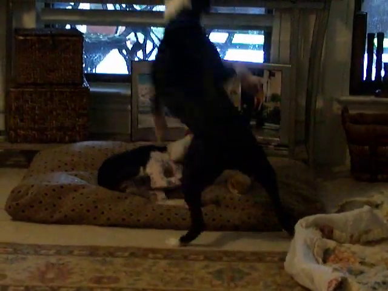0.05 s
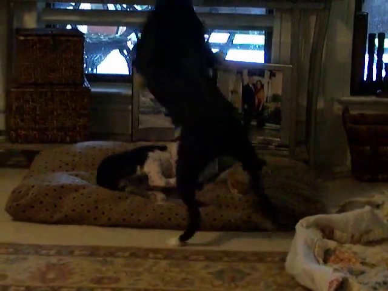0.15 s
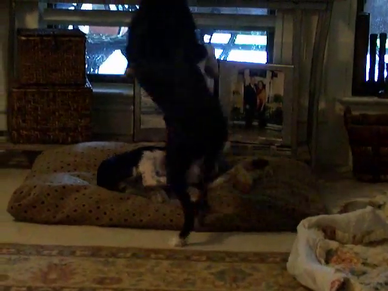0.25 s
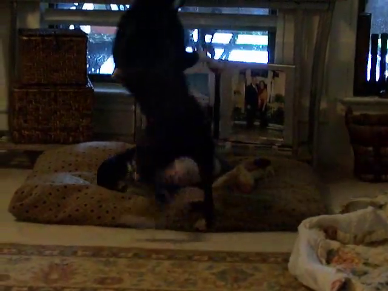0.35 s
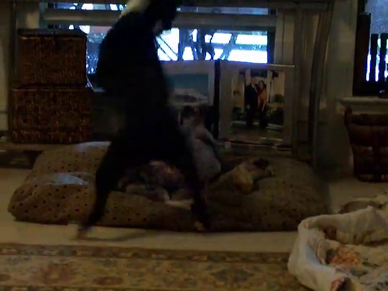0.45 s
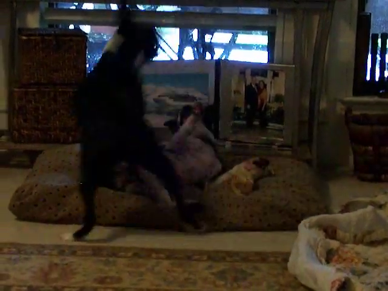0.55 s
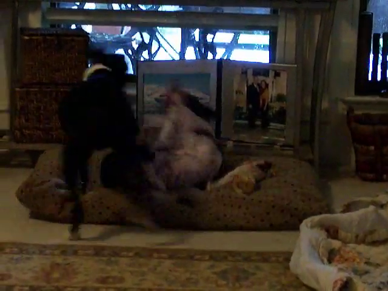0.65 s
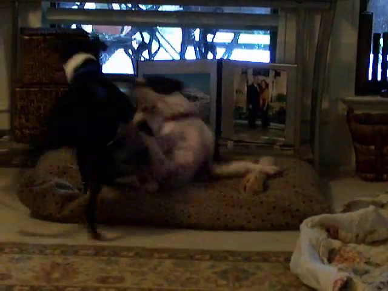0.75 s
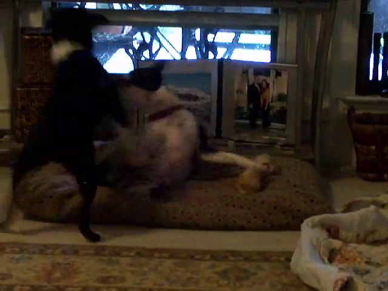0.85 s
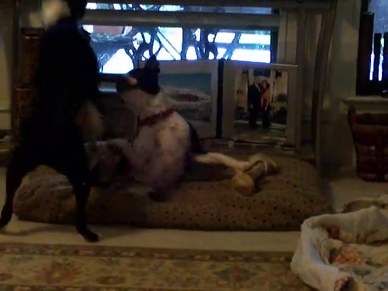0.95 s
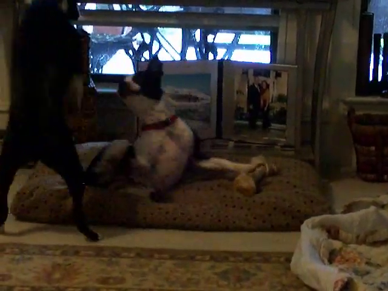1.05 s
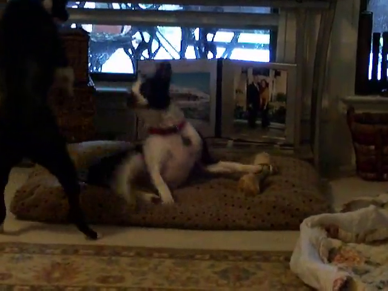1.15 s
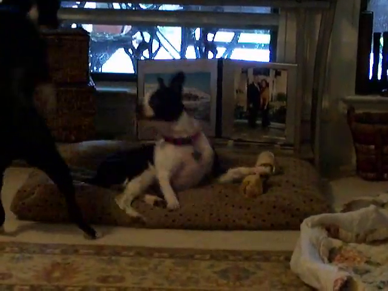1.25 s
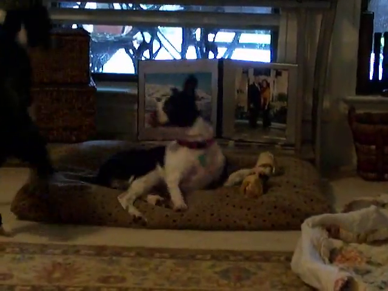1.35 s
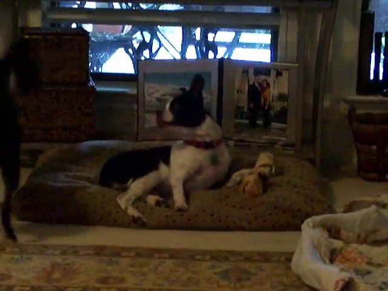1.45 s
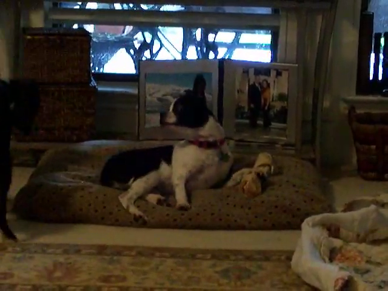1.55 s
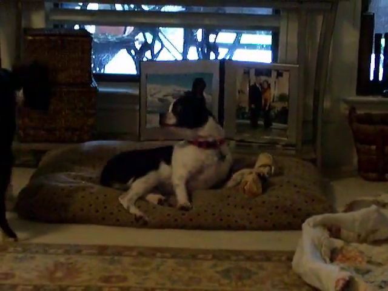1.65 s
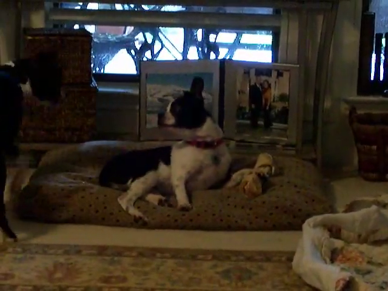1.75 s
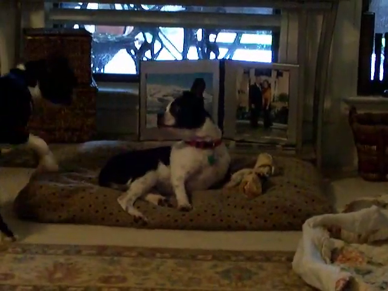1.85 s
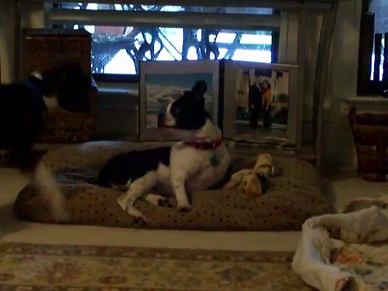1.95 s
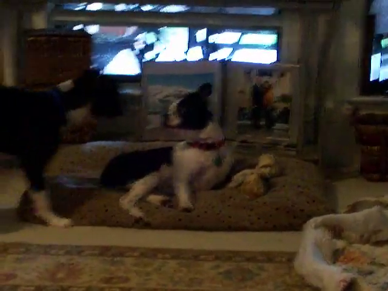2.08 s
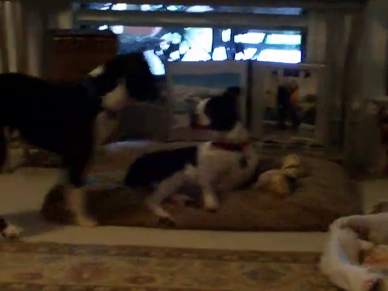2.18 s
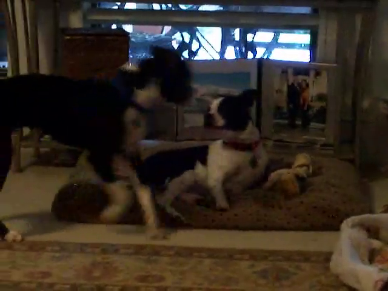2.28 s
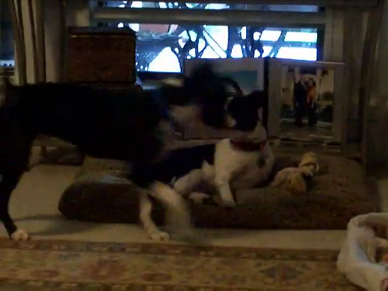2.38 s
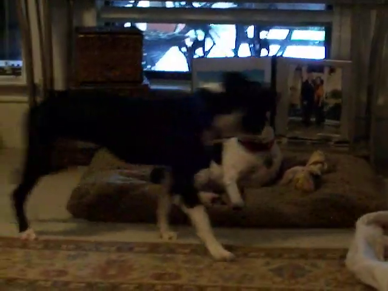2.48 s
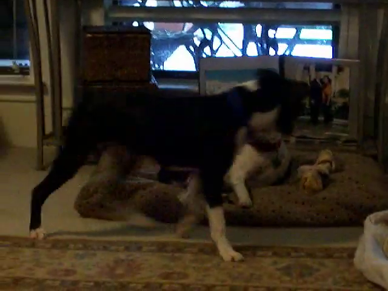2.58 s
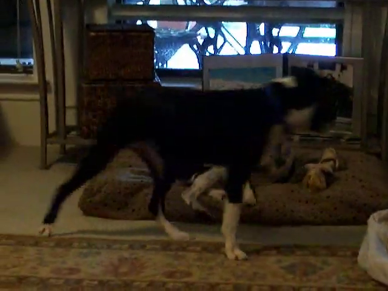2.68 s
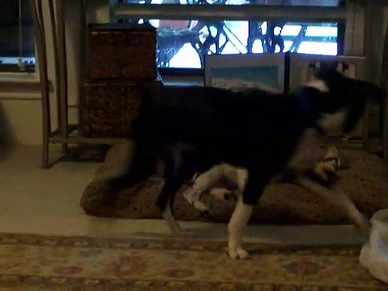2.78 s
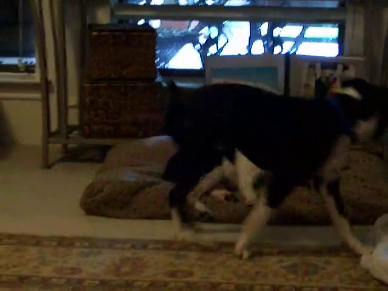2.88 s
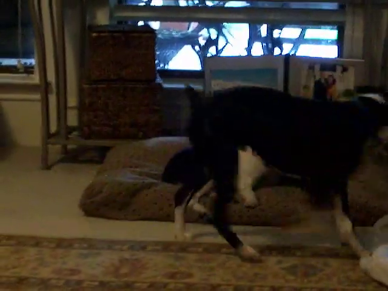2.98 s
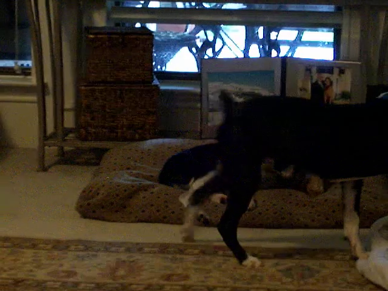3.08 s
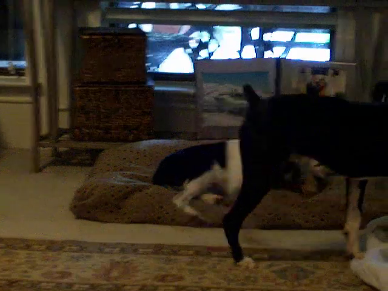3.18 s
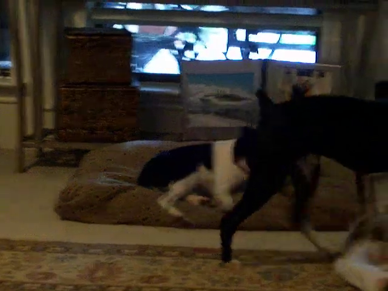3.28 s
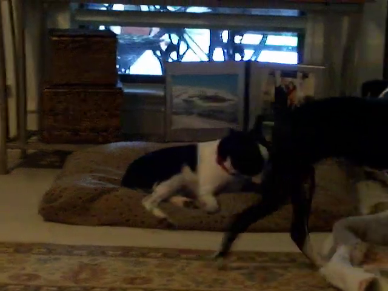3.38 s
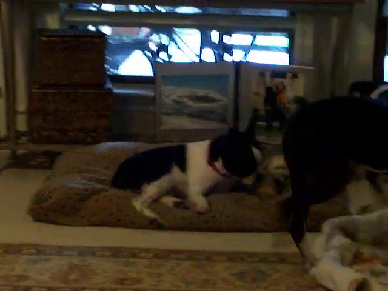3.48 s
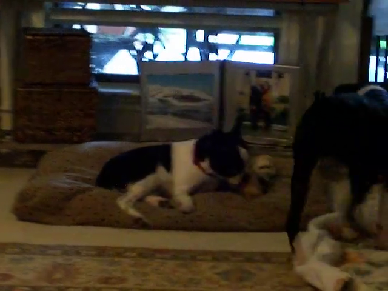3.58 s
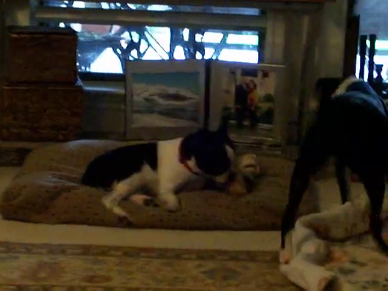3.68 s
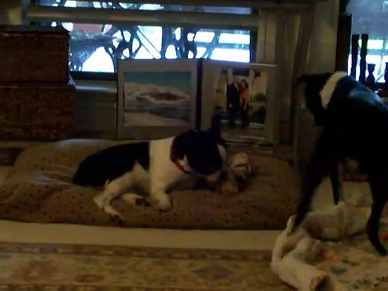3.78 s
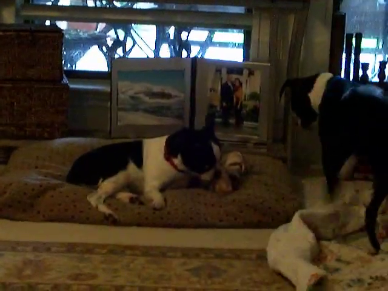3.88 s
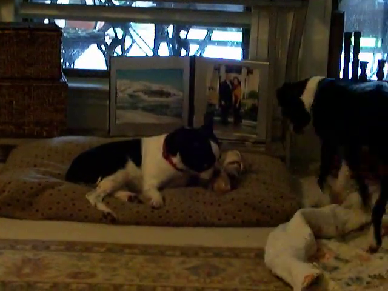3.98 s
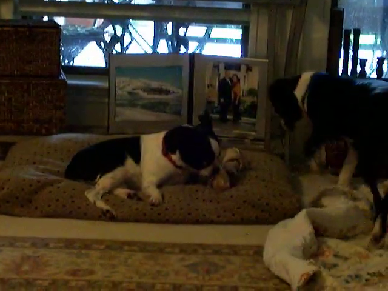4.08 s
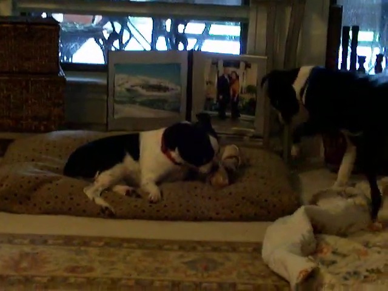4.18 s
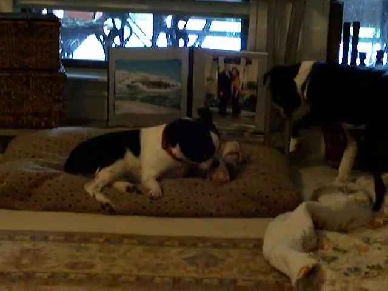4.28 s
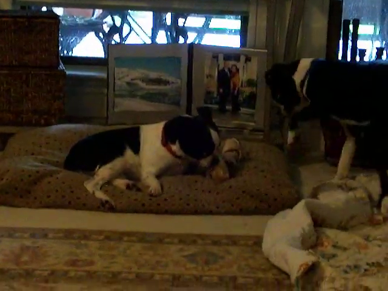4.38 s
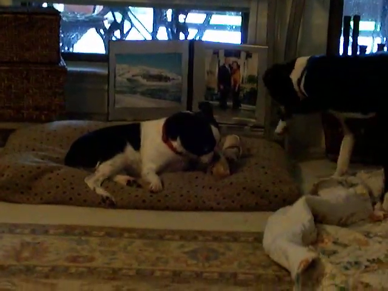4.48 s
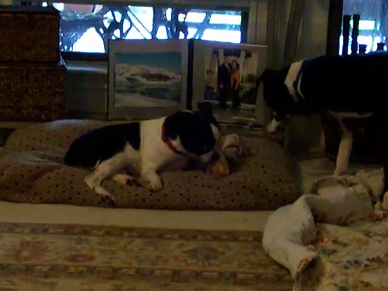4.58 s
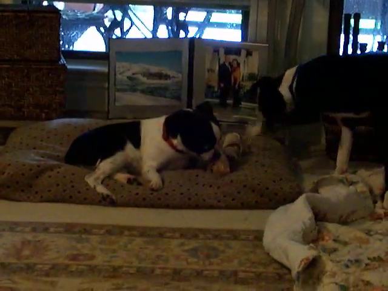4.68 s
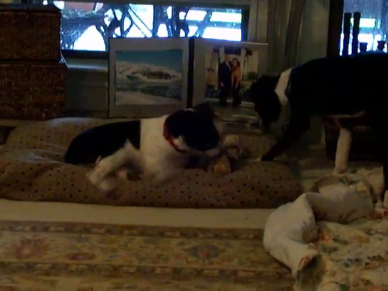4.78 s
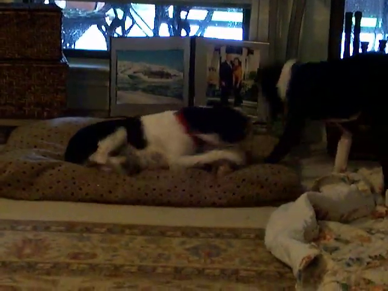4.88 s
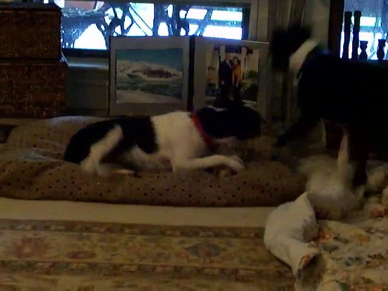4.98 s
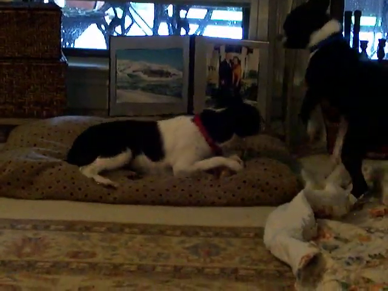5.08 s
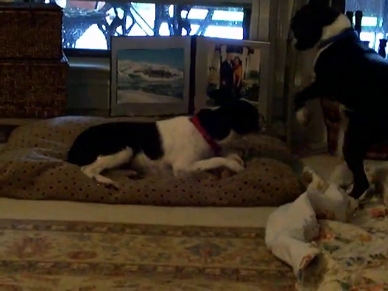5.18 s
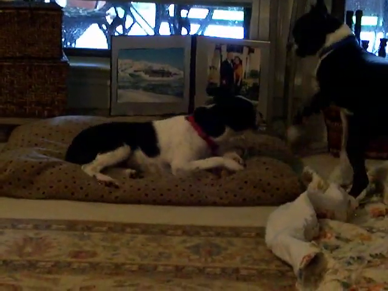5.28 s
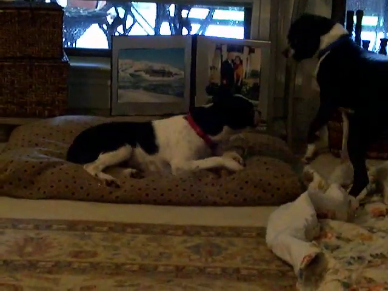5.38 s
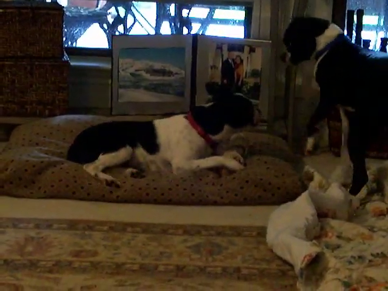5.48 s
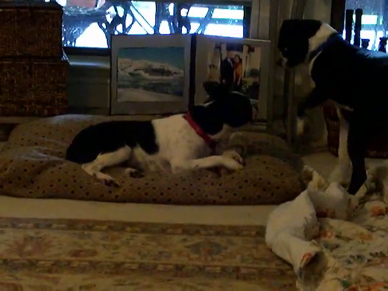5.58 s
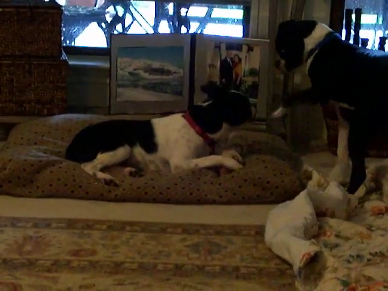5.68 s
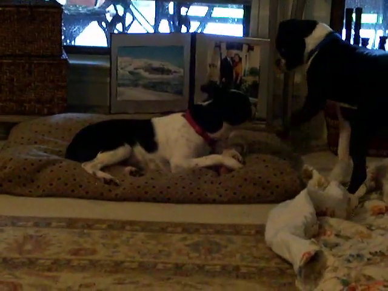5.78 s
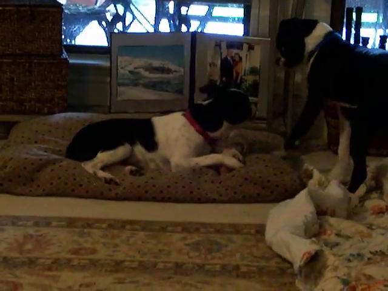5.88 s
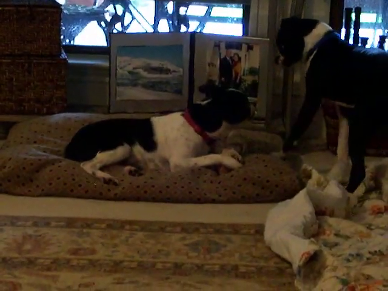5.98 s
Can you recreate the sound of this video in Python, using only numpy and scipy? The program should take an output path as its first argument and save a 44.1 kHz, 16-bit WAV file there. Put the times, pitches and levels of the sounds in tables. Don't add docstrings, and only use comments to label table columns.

```python
import sys
import numpy as np
from scipy import signal
from scipy.fft import rfft, irfft, next_fast_len
from scipy.io import wavfile
from scipy.ndimage import map_coordinates

SR = 44100
rng = np.random.default_rng(int(sys.argv[2]) if len(sys.argv) > 2 else 0)


def elevation(decibels):
    levels = np.asarray(decibels, float)
    return 10 ** (levels / 20)


def transcribe(signal):
    frames = np.atleast_2d(signal).T
    limited = np.clip(frames, -1, 1)
    pcm = np.round(limited * 32767).astype(np.int16)
    wavfile.write(sys.argv[1], SR, pcm)


N = 266584
T = np.arange(N) / SR


def unit(x):
    return x / np.sqrt(np.mean(x ** 2) + 1e-20)


def along(points, hz):
    f, v = np.transpose(points)
    return np.interp(np.log(hz + 1), np.log(f + 1), v)


def curves(rows):
    s, *columns = np.transpose(rows)
    opens_at_once = (s[0] == 0) * (T < .01)
    gate = np.clip(np.minimum(T - s[0], s[-1] - T) * 500 + opens_at_once, 0, 1)
    return [np.interp(T, s, column) for column in columns] + [gate]


def wobble(rate):
    knots = rng.standard_normal(int(N * rate / SR) + 4)
    return map_coordinates(knots, [T * rate])


def swell(s, db, rise, held, fall):
    before = np.maximum(s - T, 0)
    after = np.maximum(T - s - held, 0)
    return elevation(db - 20 * before / abs(rise) - 20 * after / abs(fall))


def filtered(x, response):
    m = next_fast_len(N + 8192)
    return irfft(rfft(x, m) * response(np.fft.rfftfreq(m, 1 / SR)), m)[:N]


def cavity(modes):
    def response(f):
        total = 0
        for k, (centre, width, db) in enumerate(modes):
            resonance = 1j * f * width / (centre * centre - f * f + 1j * f * width)
            total = total + (-1) ** k * elevation(db) * resonance
        return total
    return response


def steep(hz):
    return lambda f: (1j * f / (hz + 1j * f)) ** 4


def noise(modes):
    return unit(filtered(rng.standard_normal(N), cavity(modes)))


# start_s, depth_db, held_s
DUCKS = [
    (.675, 15.5, 1.0),
    (1.5, 4, .3),
    (4.83, 9.5, 1.3),
]


def gain_control(dip):
    duck_s, recover_s, dip_s = 0.066, 1.97, .15
    gain_db = np.zeros(N)
    for s, depth_db, held in DUCKS:
        t = np.maximum(T - s, 0)
        back = np.exp(-np.maximum(t - held, 0) / recover_s) + dip * np.exp(-t / dip_s)
        gain_db -= depth_db * (1 - np.exp(-t / duck_s)) * back
    return gain_db


# freq_hz, density_db
HISS = [(150, -33), (300, -1), (500, -3), (800, -8), (1300, -13), (3000, -17.5), (5000, -19.5),
        (6500, -19.5), (7500, -14.5), (8500, -24.5), (9200, -33)]
# freq_hz, density_db
RUMBLE = [(40, -19), (60, 4), (120, -1.5), (170, -2), (260, -7), (400, -18.5), (600, -37.5)]
# freq_hz, density_db
HANDLING = [(8, -18), (18, 12), (40, 1.5), (60, -1), (100, -43)]
# peak_s (full level reached), level_db, held_s
SHIFTS = [(0, -44.5, 0.074), (.68, -43.5, 0.013), (1.48, -49, .25), (2.12, -52, .03), (2.71, -45.5, .01),
          (3.18, -45.5, .44), (3.87, -49, .1), (4.46, -48.5, 0.0094), (4.73, -45, .01),
          (5.21, -44.5, 0.0077), (6.03, -48, .01)]


def background():
    hiss_db, rumble_db, whine_db, hand_db = -55, -46, -62.5, -48.5
    whine_hz, shift_rise_s, shift_fall_s = 6903.3, .15, 0.09
    gain_db = gain_control(-0.19)
    hiss, rumble, hand = [unit(filtered(rng.standard_normal(N), lambda f: elevation(along(colour, f))))
                          for colour in (HISS, RUMBLE, HANDLING)]
    whine = np.sqrt(2) * np.sin(2 * np.pi * whine_hz * T + .3 * wobble(20))
    whine = elevation(whine_db + gain_control(1.1)) * whine
    shifts = [swell(s, db, shift_rise_s, held, shift_fall_s) for s, db, held in SHIFTS]
    resting = elevation(hand_db + 0.3 * gain_db + 1.7 * wobble(3.7))
    grip = np.max(shifts + [resting], axis=0)
    hand = grip * elevation(1.6 * wobble(30)) * hand
    rumble = elevation(rumble_db + gain_db + 0.62 * wobble(8.0)) * rumble
    hiss = elevation(hiss_db + gain_db + 0.38 * wobble(8.1)) * hiss
    return hiss + whine + rumble + hand


# peak_s (full level reached), level_db, rise_s, held_s, fall_s
AIR = [(0, -35, .01, 0.0047, 0.078), (.5, -44, .03, 0.1, 0.011), (.6, -45.5, 0.11, 0.063, 0.004),
       (.79, -49.5, .06, .005, 0.08), (1.512, -49, 0.014, 0.027, 0.083), (2.055, -64.5, .045, .055, 0.049),
       (3.262, -58, .04, 0.032, .07), (3.319, -55, 0.053, 0.044, .09), (4.75, -46, .002, .05, 0.0036),
       (5.748, -61.5, .1, 0.065, 0.11), (.527, -56, .03, .035, .06), (5.0, -54.5, .1, 0.071, 0.16)]
# freq_hz, width_hz, level_db
AIRWAYS = [
    [(1610, 260, 0), (2170, 420, -1.5), (3896, 1800, -11), (8200, 3200, -20.5)],
    [(181, 41, -0.5), (407, 76, -2.5), (907.5, 250, -13.5)],
    [(1220, 3700, -2.5), (2780, 180, 5.5), (3660, 1100, -9.5), (6600, 900, -19.5)],
    [(450, 120, -3.5), (620, 150, -3.5)],
    [(701, 160, -2.5), (1035, 78, 7.5), (2090, 1250, -5), (3970, 300, -1.5), (5480, 3000, -10)],
    [(630, 85, 1.5), (1470, 160, 2), (2320, 230, -4), (3100, 800, -13)],
    [(1004, 490, -8), (1654, 180, 3), (1910, 340, -0.5)],
    [(620, 230, -2.5), (1510, 68, 4.5), (2120, 350, -2.5), (2450, 100, -4)],
    [(1730, 750, -7), (2704, 740, -2), (3880, 1300, -1.5), (5130, 2500, -3.5), (7570, 1300, -8.5)],
    [(2350, 1100, -1.5), (3716, 2100, 1.5), (5460, 5200, -2), (7440, 890, -1.5)],
    [(2700, 90, -1)],
    [(290, 130, 0)],
]


def breaths():
    out = np.zeros(N)
    for puff, airway in zip(AIR, AIRWAYS):
        flutter = elevation(3.7 * np.tanh(wobble(60)))
        out += swell(*puff) * flutter * noise(airway)
    return out


# start_s, peak_db, low_mode_db (relative to the peak)
TAG = [(0.0344, -54, -12), (0.1501, -43, -22), (0.2164, -37, -21), (0.2648, -47.5, -26), (0.3194, -60, -10),
       (0.601, -38, -26.5), (0.9572, -60, -16), (1.0144, -57, -10), (1.1757, -58, -18), (1.923, -77, -13),
       (1.9543, -82, -14), (2.0303, -60, -18), (2.0794, -68, -17), (2.6983, -57, -14.5),
       (2.7621, -63.5, -11.5), (2.828, -54, -17), (2.849, -52.5, -7), (5.0608, -58, -15),
       (5.1223, -59, -21), (5.216, -65, -15), (5.2495, -66.5, -19)]
# freq_hz, flicker_width_hz, t60_s
TAG_MODES = [(6420, 80, .11), (5225, 45, .22)]


def tag():
    strikes, t = np.zeros((2, N + SR)), np.arange(SR // 4) / SR
    decay = np.array([elevation(-60 * t / t60) for _, _, t60 in TAG_MODES])
    decay = decay * (1 - np.exp(-t / .003))
    for s, db, low_db in TAG:
        start = round(s * SR)
        strikes[:, start:start + len(t)] += elevation([[db], [db + low_db]]) * decay
    ring = []
    for hz, width, _ in TAG_MODES:
        flicker = elevation(5.9 * wobble(1.5 * width))
        ring.append(unit(flicker * np.sin(2 * np.pi * hz * T + 2.0 * wobble(width))))
    return elevation(-2.0) * np.sum(strikes[:, :N] * ring, axis=0)


# start_s,
# peak_db, colour_hz, width_hz, t60_s
TICKS = [(.216, -36, 4600, 3000, .015), (.6435, -29, 4300, 900, .05), (.6435, -36, 2000, 600, .05),
         (.6435, -33, 6300, 1500, .05), (1.403, -51, 1500, 5000, .012), (1.42, -58, 1600, 600, .08),
         (1.70, -62, 1600, 1200, .08), (1.80, -64, 1500, 4000, .015), (2.542, -60, 4200, 1500, .03),
         (2.668, -53, 4300, 600, .12), (2.895, -62, 2800, 900, .04), (5.058, -51, 5200, 3000, .04),
         (5.504, -62, 5480, 150, .05), (.896, -54, 5800, 2500, .06), (.925, -54, 5500, 2500, .1),
         (.957, -56, 5000, 3000, .05), (.208, -54, 4500, 600, .15), (.67, -18, 1900, 1500, .07),
         (1.403, -46, 250, 400, .03)]


def ticks():
    out = np.zeros(N)
    for s, db, hz, width, t60 in TICKS:
        crack = (T >= s) * elevation(db - 7.5 - 60 * np.abs(T - s) / t60)
        out += crack * noise([(hz, width, 0)])
    return out


# time_s, pitch_hz
YELP_PITCH = [
    (.669, 900),
    (.679, 915),
    (.682, 1130),
    (.691, 1080),
    (.703, 1310),
    (.714, 1351),
    (.733, 1345),
    (.746, 1235),
    (.87, 1235),
]
# multiple (of the pitch), level_db (relative to the second partial)
YELP_UPPER = [(3, -22), (4, -31), (5, -35)]
# freq_hz, width_hz, level_db
YELP_MOUTH = [(1374, 130, 3.5), (1900, 450, -4.5), (2310, 400, -1), (3800, 440, -8.5), (5030, 300, -18.5),
              (6490, 2600, -25.5)]
# peak_s (full level reached), level_db, held_s
SOBS = [
    (.672, -14, .003),
    (.686, -13, 0),
    (.697, -16, .001),
    (.706, -14, .029),
    (.743, -19, 0),
    (.751, -21, 0),
]
# peak_s (full level reached), level_db, rise_s, held_s, fall_s
LOOSE = [
    (.69, -30, .035, .026, .017),
    (.735, -30, .009, .004, .02),
]
# peak_s (rasp at full level), held_s, fall_s, rasp_db, squeal_db
LEAKS = [
    (.672, .026, .014, -30.5, -34.5),
    (.74, .024, 0.089, -27, -53.5),
]


def yelp():
    sob_rise_s, sob_fall_s, fade_s = .006, .008, .036
    leak_rise_s, late_s = .008, .01
    pitch, gate = curves(YELP_PITCH)
    falls = [sob_fall_s] * (len(SOBS) - 1) + [fade_s]
    sobs = [swell(s, db, sob_rise_s, held, fall) for (s, db, held), fall in zip(SOBS, falls)]
    phase = 2 * np.pi * np.cumsum(pitch * (1 + 0.0037 * wobble(300))) / SR
    tone = np.sin(2 * phase)
    for k, db in YELP_UPPER:
        tone = tone + elevation(db + 1.7 * wobble(130)) * np.sin(k * phase)
    loose = sum(swell(*row) for row in LOOSE) * np.sin(phase)
    tone = np.max(sobs, axis=0) * tone + loose
    rasp, squeal = np.zeros(N), np.zeros(N)
    for s, held, fall, rasp_db, squeal_db in LEAKS:
        rasp += swell(s, rasp_db, leak_rise_s, held, fall)
        squeal += swell(s + late_s, squeal_db, leak_rise_s, held - late_s, fall)
    rasp = rasp * elevation(2.2 * wobble(200)) * unit(filtered(noise(YELP_MOUTH), steep(610)))
    squeal = squeal * noise([(5640, 210, 0)])
    return gate * (np.sqrt(2) * tone + rasp + squeal)


# time_s, pitch_hz, level_db
WHIMPER = [
    (2.658, 493, -70),
    (2.664, 489, -49.5),
    (2.685, 518, -43),
    (2.694, 497, -53.5),
    (2.71, 509, -50),
    (2.74, 510, -80),
]
# multiple, level_db
WHIMPER_PARTS = [(1, 0), (2, -12), (3, -24), (4, -26), (5, -24)]


def whimper():
    pitch, db, gate = curves(WHIMPER)
    phase = 2 * np.pi * np.cumsum(pitch * (1 + 0.0135 * wobble(150))) / SR
    tone = sum(elevation(d + 2 * wobble(60)) * np.sin(k * phase) for k, d in WHIMPER_PARTS)
    return gate * np.sqrt(2) * elevation(db) * tone


# time_s, effort_db
BARK = [
    (4.803, -48),
    (4.815, -32.5),
    (4.848, -17.5),
    (4.865, -27),
    (4.88, -24.5),
    (4.9, -26.5),
    (4.922, -26),
    (4.938, -37),
    (4.97, -71),
]
# freq_hz, width_hz, level_db
SHUT = [(624, 210, -10.5), (847, 68, 0), (1182, 73, 3), (1820, 700, -10), (2610, 220, -10.5)]
# freq_hz, width_hz, level_db
OPEN = [(585, 70, -2), (880, 200, -18), (1230, 160, -2), (1440, 180, 0), (1930, 550, -6), (2300, 260, -3),
        (2720, 520, -1)]
# freq_hz, width_hz, level_db
TEETH = [(3740, 510, 1), (4210, 710, -6), (4900, 790, -12), (6100, 930, -12.5), (7500, 520, -18)]


def bark():
    start_hz, end_hz, sag_s = 420.9, 266.2, .03
    jaw_after_s, jaw_swing_s, jaw_shut, jaw_open = .066, .004, 0.11, 0.99
    start_s, onset_s = BARK[0][0], BARK[1][0]
    db, gate = curves(BARK)
    rate = end_hz + (start_hz - end_hz) * np.exp(-np.maximum(T - onset_s, 0) / sag_s)
    cycles = np.cumsum(rate * (1 + .12 * wobble(200))) / SR
    slaps = np.diff(np.floor(cycles), prepend=0) * elevation(2 * wobble(300))
    puffs = rng.standard_normal(N) * np.exp(-1.2 * (cycles % 1))
    folds = 0.52 * unit(slaps * gate) + 0.8 * unit(puffs * gate)
    folds = elevation(db) * gate * folds * np.sqrt(np.mean(gate))
    swing = (1 + np.tanh((T - start_s - jaw_after_s) / jaw_swing_s)) / 2
    opening = np.clip(jaw_shut + (jaw_open - jaw_shut) * swing, 0, 1)
    throat = filtered(folds * np.sqrt(1 - opening), cavity(SHUT))
    throat = throat + filtered(folds * np.sqrt(opening), cavity(OPEN))
    bright = filtered(folds * elevation(.5 * (db + 15) - 10), cavity(TEETH))
    chest = swell(onset_s, -36, .011, 0.038, 0.036) * noise([(211, 47, 0), (324, 120, -14)])
    return elevation(19.0) * filtered(throat - bright, steep(200)) + chest


# freq_hz, t60_s
ROOM = [(150, 0.27), (600, 0.38), (1500, 0.37), (3000, 0.3), (6000, 0.24), (9000, 0.38)]


def room(x):
    hall_db, hall_longer = -22, 1.7
    hz, t, z = signal.stft(rng.standard_normal((2, SR // 2)), SR, nperseg=256)
    fade_db = -60 * t / along(ROOM, hz)[:, None]
    fade = elevation(fade_db) + elevation(hall_db + fade_db / hall_longer)
    build = np.minimum(t / 0.015, 1)
    tails = signal.istft(z * fade * build, SR, nperseg=256)[1]
    turn = 2 * np.pi * 6 * T
    parts = np.pad(x * [np.cos(turn), np.sin(turn)], ((0, 0), (250, 0)))
    wet = signal.fftconvolve(parts, tails / np.linalg.norm(tails[0]), axes=1)
    return wet.sum(axis=0)[:N]


def scene():
    shrill, hoarse = yelp(), bark()
    small = whimper() + tag() + ticks() + breaths()
    wet = elevation(-9.5) * room(shrill) + elevation(-5.5) * room(hoarse) + elevation(-10.5) * room(small)
    return (shrill + hoarse + small + wet + background())[None]


def low_pass(x):
    return signal.sosfilt(signal.butter(12, 8990, fs=SR, output="sos"), x)


# freq_hz, level_db
EDGE = [(6500, 1), (7800, -6), (8600, -16), (9000, -29.5), (9150, -70)]


def record(dry):
    x = dry[0] / (1 + np.abs(dry[0] / .65) ** 4) ** (1 / 4)
    x = filtered(x, lambda f: elevation(along(EDGE, f)))[None]
    return low_pass(x)


dry = scene()
out = record(dry)
transcribe(out)
```